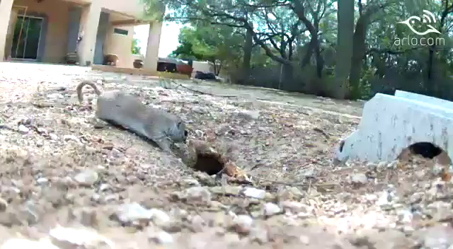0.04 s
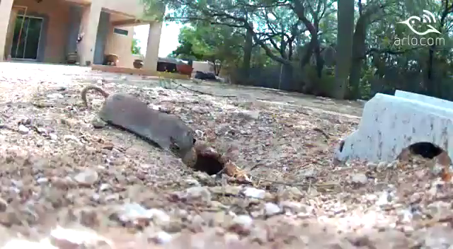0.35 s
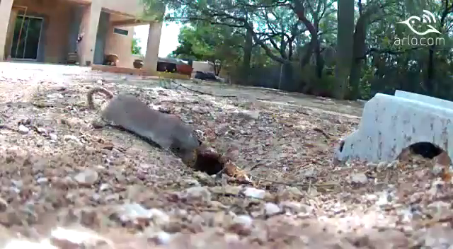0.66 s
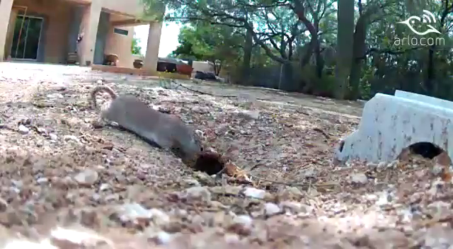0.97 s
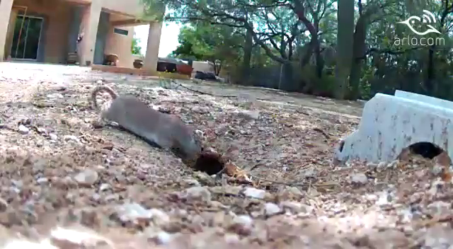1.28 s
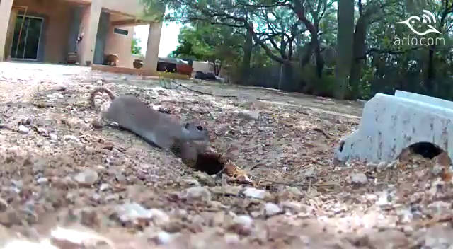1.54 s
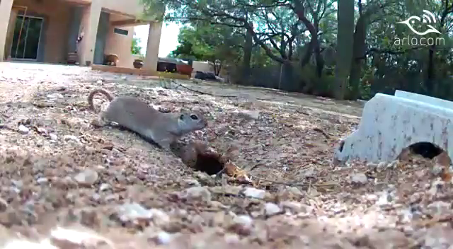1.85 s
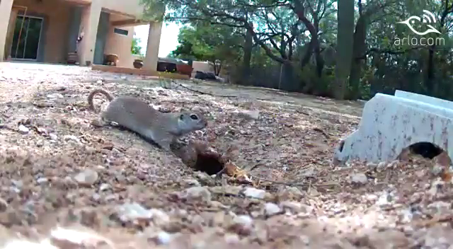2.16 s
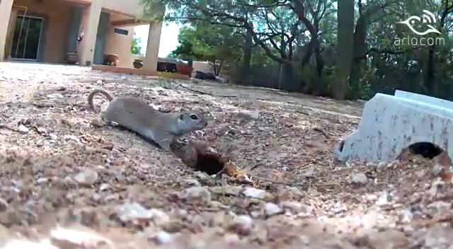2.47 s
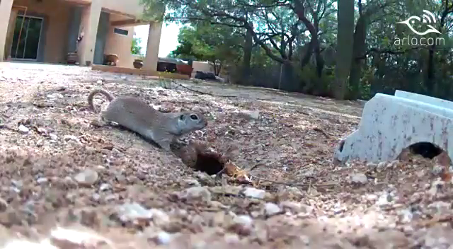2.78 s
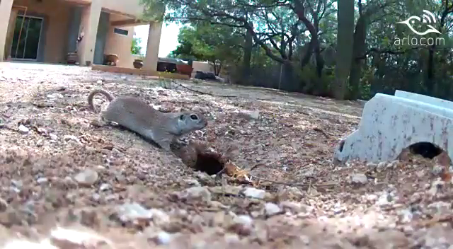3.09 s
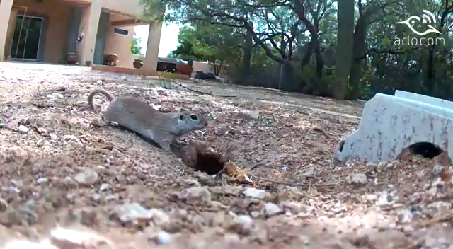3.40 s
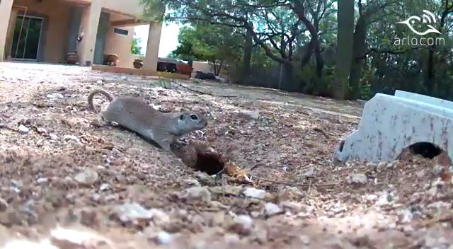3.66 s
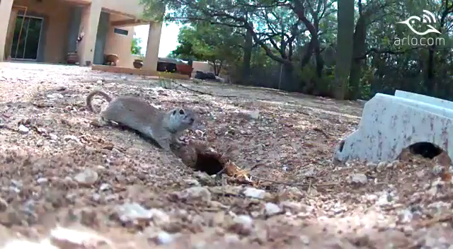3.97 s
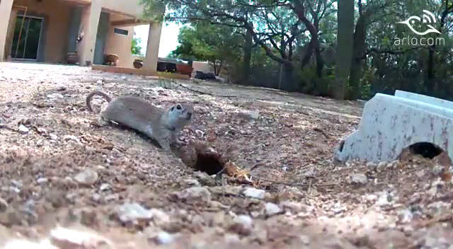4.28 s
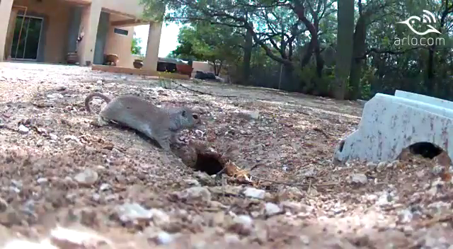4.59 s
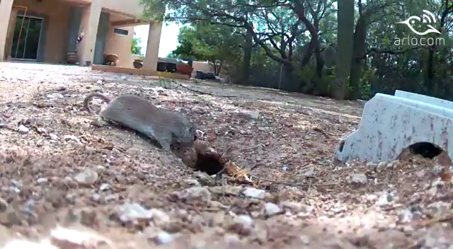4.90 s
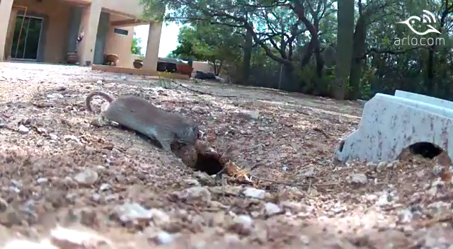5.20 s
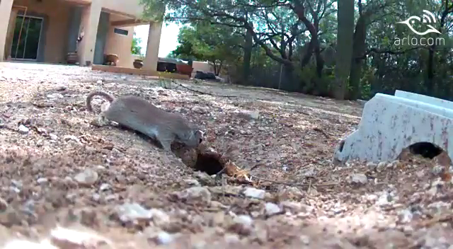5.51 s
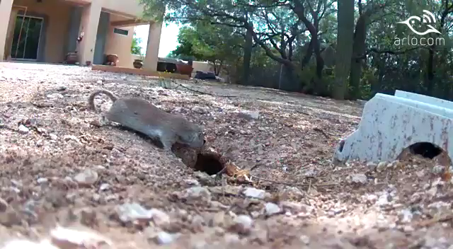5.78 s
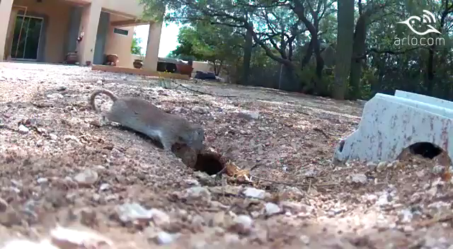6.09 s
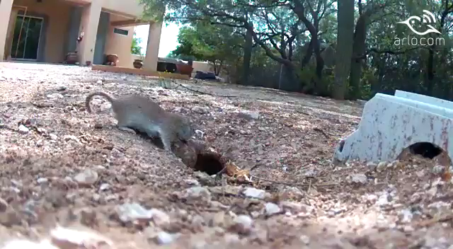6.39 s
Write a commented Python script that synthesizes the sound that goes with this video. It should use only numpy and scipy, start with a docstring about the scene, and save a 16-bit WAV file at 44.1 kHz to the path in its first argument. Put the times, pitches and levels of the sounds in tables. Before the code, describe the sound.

Far road noise rises and slowly recedes around a quiet yard, picked up by a hissy outdoor microphone that switches on with a small pop. A machine hums faintly underneath, and a few tiny high chips barely clear the hiss. A distant engine cruises, then accelerates; a very soft rustle passes before the engine shifts up and fades a little.

```python
"""A quiet yard, from a security camera's microphone at the house. It switches on with a small pop, and
from then on far traffic swells as cars pass and slowly recedes, over a machine's hum and the mic's hiss.
From about 1.7 s a few faint high chips barely clear that hiss. One distant engine comes in at a steady
speed and pulls away from 2.8 s; a soft high rustle comes and goes near 4.8 s. The engine booms through
its exhaust resonance, changes up a gear at 6 s and eases off in level."""
import sys
import numpy as np
from scipy import signal
from scipy.fft import rfft, irfft, next_fast_len
from scipy.io import wavfile

SR = 44100
rng = np.random.default_rng(int(sys.argv[2]) if len(sys.argv) > 2 else 0)


def log_audio(samples):
    """Write samples as a 16-bit WAV file to the path given in sys.argv[1]."""
    # one column per channel
    frames = np.atleast_2d(samples).T
    # limit to full scale, then quantise
    limited = np.clip(frames, -1, 1)
    pcm = np.round(limited * 32767).astype(np.int16)
    wavfile.write(sys.argv[1], SR, pcm)


N = 293265
T = np.arange(N) / SR

# Spectra of the far road as it reaches the yard, lowest band first: f/Hz, relative level/dB
ROAD_RUMBLE = [(8, -17), (28, -9.5), (45, 2), (70, -1.5), (110, -3), (170, -11), (260, -22.5), (500, -49.5)]
ROAD_BODY = [(90, -15.5), (170, -1), (270, -0.5), (340, -5), (460, -7.5), (620, -13), (900, -22),
             (1600, -51)]
ROAD_TYRES = [(300, -19.5), (550, -2.5), (750, -1), (1080, 0), (1200, -3), (1330, -3), (1650, -12.5),
              (2400, -42)]
ROAD_FIZZ = [(900, -17), (1500, 0), (2000, 0.5), (2600, -6.5), (3200, -7.5), (4500, -14.5), (8000, -29.5)]
# Far cars at their nearest to the mic: t/s, half length/s, lift/dB (each band takes a share)
CAR_PASSES = [(1.0, 0.41, 1.4), (1.7, .22, 1.5), (2.423, .42, 2.25), (4.0, 0.33, 1.7), (5.7, .35, 0.5),
              (6.6, 0.27, 2.2)]
# Narrow swells in the road noise: t/s, half length/s, centre f/Hz, half width/Hz, level/dB
ROAD_SWELLS = [(0.803, 0.18, 178.5, 12, -51.5), (1.098, 0.067, 567, 22, -57), (2.25, .45, 330, 82, -53.5),
               (2.358, 0.19, 716, 230, -58), (2.75, .4, 225, 45, -54.5), (3.98, 0.29, 988, 250, -61.5),
               (5.7, .3, 45.8, 13, -52)]
# Exhaust orders of the distant engine: multiple of the firing rate, relative level/dB
EXHAUST_ORDERS = [(1, -1.5), (2, -17), (3, -19), (4, -24)]
# That engine heard across the yard: t/s, level/dB
ENGINE_AT_MIC = [(1.3, -68), (2.05, -50), (3.45, -51), (4.2, -52.5), (4.7, -58.5), (5.2, -54.5),
                 (5.5, -47.5), (5.9, -48), (6.65, -55)]
# Tones of the machine at the house: f/Hz, level/dB
MACHINE_TONES = [(120, -59.5), (240, -61), (413, -69.5)]
# Faint high chips, perhaps an insect or a far bird: t/s, f/Hz, level/dB
HIGH_CHIPS = [(1.69, 5750, -75.5), (1.748, 5450, -74), (2.18, 5550, -75), (4.19, 5600, -74),
              (6.185, 5600, -73)]
# Spectrum of the rustle: f/Hz, relative level/dB
RUSTLE_SPECTRUM = [(2000, -29.5), (4300, 0), (7700, -2.5), (8600, -18)]
# Spectrum of the microphone's self-noise: f/Hz, relative level/dB
MIC_HISS = [(100, 0), (2500, -1.5), (4000, -1), (5500, -1), (7400, -1.5), (7900, -5), (8300, -12),
            (8900, -24)]


def traffic():
    """Road noise from far off; moving air makes its upper bands flutter together."""
    air = drift(rate_hz=11)
    rumble = noise(ROAD_RUMBLE) * from_db(road_level(-46, recede_db_per_s=.35, pass_share=.17))
    body = noise(ROAD_BODY) * from_db(road_level(-49.5, recede_db_per_s=.68, pass_share=.69) + .5 * air)
    tyres = noise(ROAD_TYRES) * from_db(road_level(-57, recede_db_per_s=.43, pass_share=1) + .57 * air)
    fizz = noise(ROAD_FIZZ) * from_db(road_level(-67, recede_db_per_s=.69, pass_share=.46) + .31 * air)
    return rumble + body + tyres + fizz


def road_level(start_db, recede_db_per_s, pass_share):
    """Level/dB of one road band at the mic: it slowly recedes, and each passing car lifts it."""
    lift_db = sum(db * bell(s, half_length_s) for s, half_length_s, db in CAR_PASSES)
    return start_db - recede_db_per_s * T + pass_share * lift_db


def road_swells():
    """Passing vehicles each briefly lift one narrow part of the road noise."""
    return sum(burst(*row) for row in ROAD_SWELLS)


def engine(jitter=.013, scatter=.36, pipe_hz=272, pipe_half_width_hz=26, pipe_db=13):
    """One far engine: only low orders reach the yard, booming as they cross the pipe's resonance."""
    firing_hz = firing_rate()
    cycles = np.cumsum(firing_hz * (1 + jitter * drift(rate_hz=22.7))) / SR
    exhaust = np.zeros(N)
    for order, db in EXHAUST_ORDERS:
        boom_db = pipe_db / (1 + ((order * firing_hz - pipe_hz) / pipe_half_width_hz) ** 2)
        # echoes from walls and trees blur the higher orders most
        paths = 1 + scatter * order * (drift(rate_hz=17) + 1j * drift(rate_hz=14))
        tone = np.exp(2j * np.pi * (order * cycles + rng.random()))
        exhaust += from_db(db + boom_db) * unit((paths * tone).real)
    level_db = np.interp(T, *np.transpose(ENGINE_AT_MIC))
    return unit(exhaust) * from_db(level_db)


def firing_rate(cruise_hz=87.85, top_hz=155.2, next_gear_hz=115.3,
                pull_s=2.8, shift_s=5.98, shift_length_s=.25):
    """The engine's firing rate/Hz: it cruises, climbs, and drops as the next gear takes hold."""
    pull = np.clip((T - pull_s) / (shift_s - pull_s), 0, 1) ** .8  # gains speed fastest at first
    shift = np.sin(np.pi / 2 * np.clip((T - shift_s) / shift_length_s, 0, 1)) ** 2
    return cruise_hz + (top_hz - cruise_hz) * pull - (top_hz - next_gear_hz) * shift


def machine_hum(waver_db=2.0, waver_rad=.6):
    """Steady motor tones from the house that waver on their way across the yard."""
    hum = np.zeros(N)
    for hz, db in MACHINE_TONES:
        amplitude = np.sqrt(2) * from_db(db + waver_db * drift(rate_hz=2.2))
        hum += amplitude * np.sin(2 * np.pi * hz * T + waver_rad * drift(rate_hz=3.6))
    return hum


def chips(half_length_s=.022, half_width_hz=330):
    """Each chip is a short rasp around one high pitch, faint at the mic."""
    return sum(burst(s, half_length_s, hz, half_width_hz, db) for s, hz, db in HIGH_CHIPS)


def rustle(peak_s=4.76, half_length_s=.46, level_db=-75, flicker_db=1.0):
    """A brief uneven swell of fine dry noise."""
    swell = noise(RUSTLE_SPECTRUM) * bell(peak_s, half_length_s)
    return swell * from_db(level_db + flicker_db * drift(rate_hz=22))


def burst(peak_s, half_length_s, centre_hz, half_width_hz, db):
    """A bell-shaped swell of narrow-band noise."""
    size = next_fast_len(N)
    hz = np.fft.rfftfreq(size, 1 / SR)
    passband = np.exp(-((hz - centre_hz) / half_width_hz) ** 2 / 2)
    band = irfft(rfft(rng.standard_normal(size)) * passband)
    return from_db(db) * unit(np.resize(band, N)) * bell(peak_s, half_length_s)


def noise(spectrum):
    """Noise of rms 1 with the given spectrum."""
    size = next_fast_len(N)
    hz, db = np.transpose(spectrum)
    shape_db = np.interp(np.log(np.fft.rfftfreq(size, 1 / SR) + 1), np.log(hz), db, right=-100)
    return unit(irfft(rfft(rng.standard_normal(size)) * from_db(shape_db), size)[:N])


def drift(rate_hz):
    """Slow random wander of rms 1, up to about the given rate."""
    hz = np.fft.rfftfreq(N // 100, 100 / SR)
    lowpass = np.exp(-(hz / rate_hz) ** 2) * (hz > 0)
    slow = irfft(rfft(rng.standard_normal(N // 100)) * lowpass)
    return unit(np.interp(T, np.linspace(0, T[-1], len(slow)), slow))


def bell(peak_s, half_length_s):
    """A smooth rise to 1 and fall, at 1/e a half length either side."""
    return np.exp(-((T - peak_s) / half_length_s) ** 2)


def from_db(db):
    """Decibels to gain."""
    return 10 ** (np.asarray(db) / 20)


def unit(x):
    """Scales to rms 1."""
    return x / np.sqrt(np.mean(x ** 2) + 1e-20)


def scene():
    """The yard at the microphone, in mono."""
    return (traffic() + road_swells() + engine() + machine_hum() + chips() + rustle())[None]


def record(dry, on_s=.2722, hiss_db=-68.5, pop_db=-39.5, pop_decay_s=.015, cutoff_hz=8700):
    """The microphone wakes with an offset that drains away, adds its hiss and loses the top treble."""
    hiss = noise(MIC_HISS) * from_db(hiss_db + .4 * drift(rate_hz=8.6))
    pop = -from_db(pop_db) * np.exp(-np.maximum(T - on_s, 0) / pop_decay_s)
    live = (dry + hiss + pop) * (T >= on_s)
    lowpass = signal.firwin(257, cutoff_hz, window=("kaiser", 8), fs=SR)
    return signal.oaconvolve(live, lowpass[None], "same")


dry = scene()
out = record(dry)
log_audio(out)
```